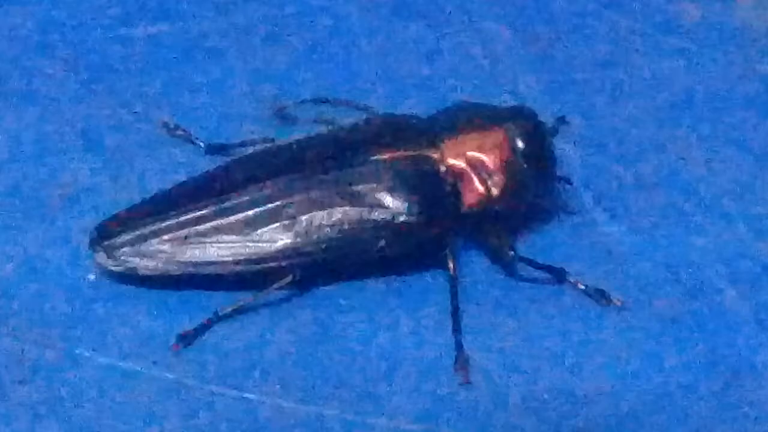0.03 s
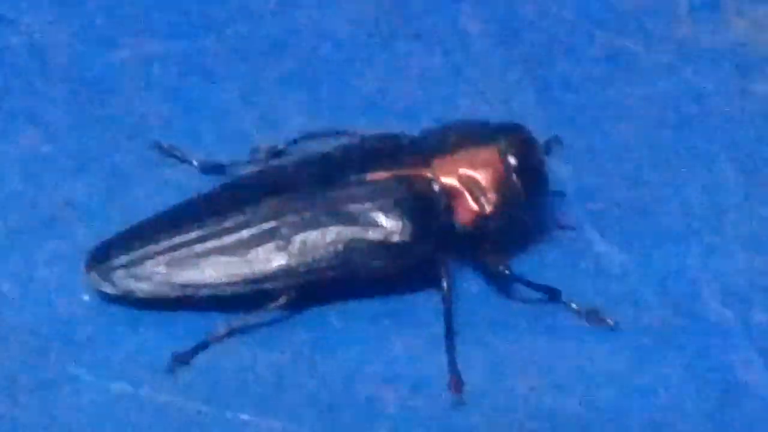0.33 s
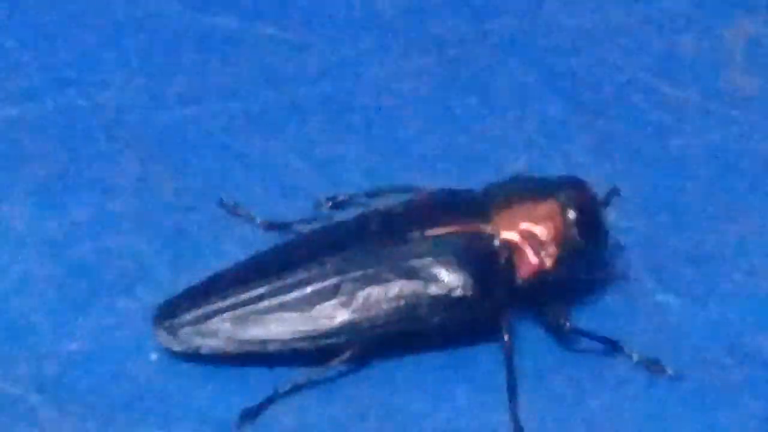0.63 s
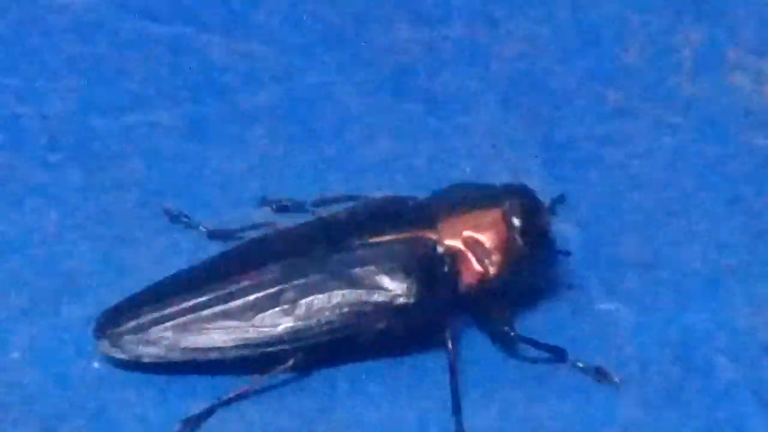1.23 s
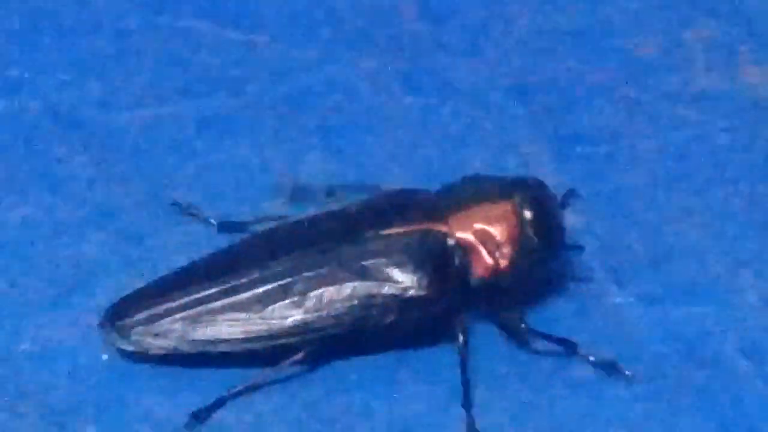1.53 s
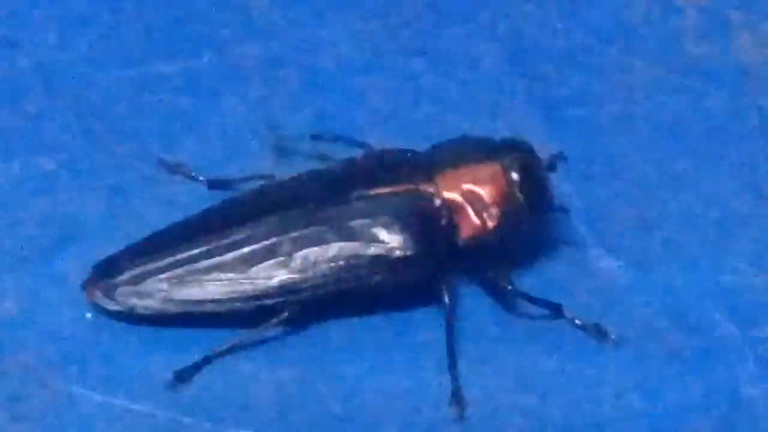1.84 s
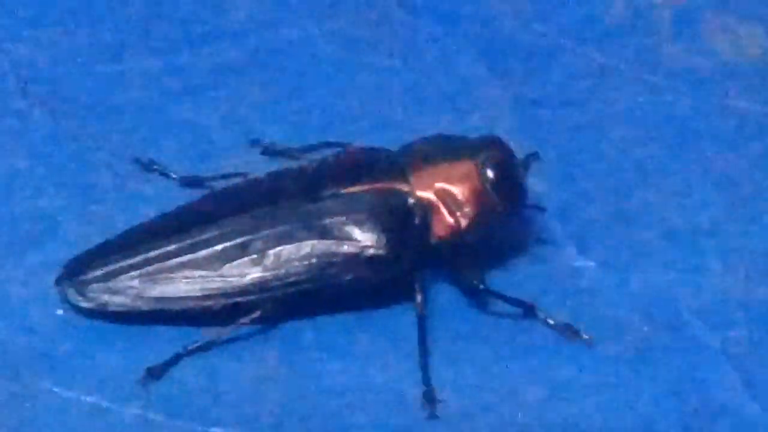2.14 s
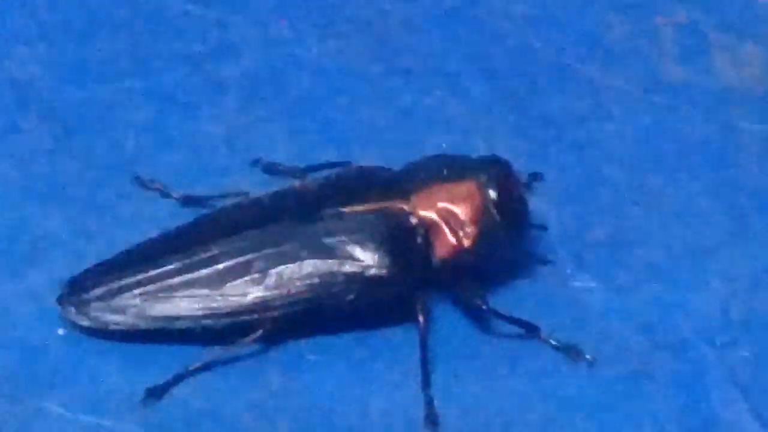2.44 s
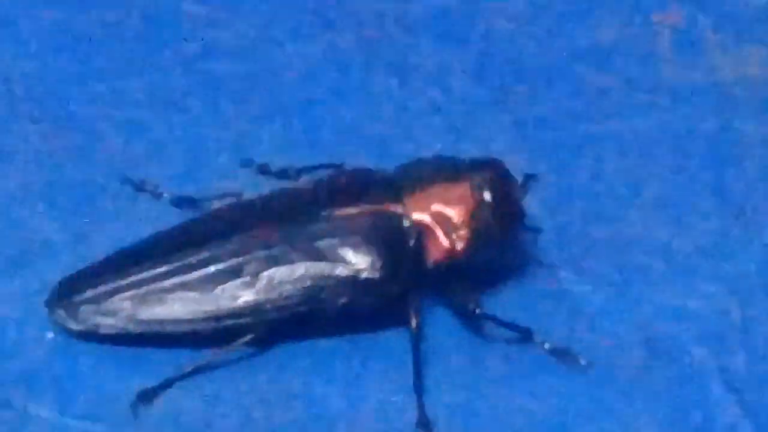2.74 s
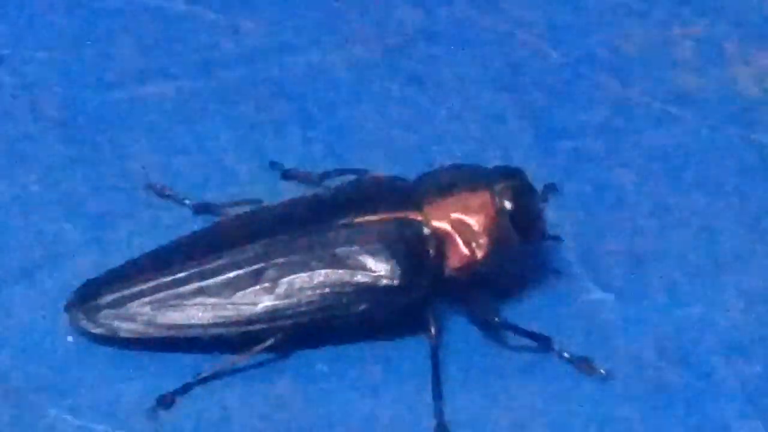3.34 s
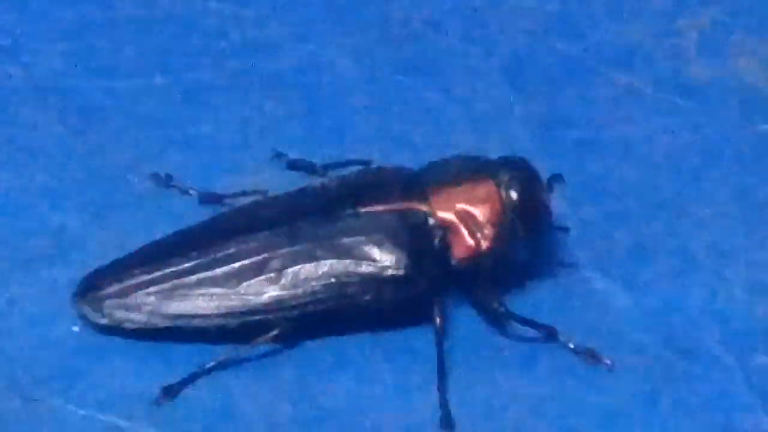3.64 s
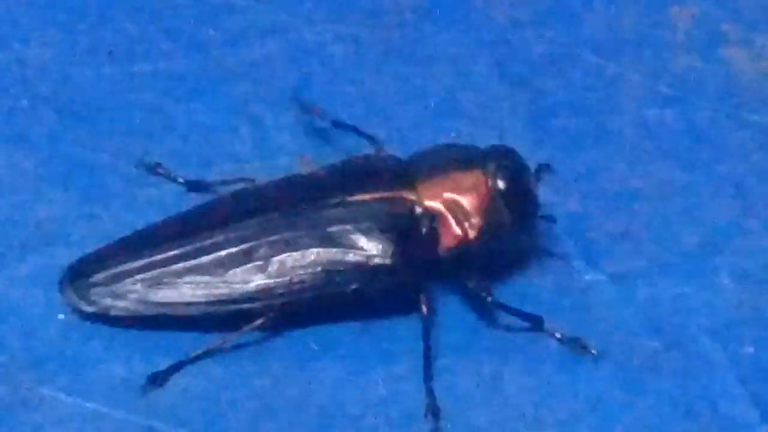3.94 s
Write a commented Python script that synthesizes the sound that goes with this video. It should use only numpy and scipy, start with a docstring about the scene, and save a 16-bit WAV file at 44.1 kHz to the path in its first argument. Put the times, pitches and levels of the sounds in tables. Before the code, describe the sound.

A steady hiss, like rain heard from inside a room, fades in at about 0.4 seconds and runs to the end at 4 seconds, fluttering slightly over low room noise and a barely audible hum. From about 0.9 seconds, faint, brief brushes of handling come and go close by. One sharp tick with a short room echo sounds at 1.6 seconds. The hiss slowly grows a little brighter.

```python
"""A steady hiss, like rain heard from inside a room, fades in after a moment of silence.
It is a wash of mid-range noise that flutters and swells, over a bed of room air and a faint hum.
Something is handled close by: a few faint brushes of friction, and one hard contact that ticks
and leaves a short room tail. The top end slowly brightens. Both channels carry the same signal."""
import sys
import numpy as np
from scipy import signal
from scipy.fft import rfft, irfft
from scipy.io import wavfile

SR = 44100
rng = np.random.default_rng(int(sys.argv[2]) if len(sys.argv) > 2 else 0)


def transcribe(u):
    """Save the signal u as a 16-bit wav file named by the first command-line argument.

    u: samples, shape (n,) or (channels, n), limited to [-1, 1]; the rate is SR.
    q: integer samples, one column per channel.
    """
    v = np.clip(np.atleast_2d(u).T, -1, 1)
    q = np.round(v * 32767).astype(np.int16)
    wavfile.write(sys.argv[1], SR, q)


N = 176400


def from_db(db):
    """Decibels to gain."""
    return 10 ** (np.asarray(db) / 20)


def unit_power(x):
    """Scale to an RMS of one."""
    return x / np.sqrt(np.mean(x ** 2) + 1e-20)


def seconds():
    """Time of every sample."""
    return np.arange(N) / SR


def fader(points):
    """Gain per sample, riding through (time [s], level [dB]) points."""
    return from_db(np.interp(seconds(), *np.transpose(points)))


def bins_hz():
    """Frequency of every spectral bin, kept above zero."""
    return np.maximum(np.arange(N // 2 + 1) * SR / N, 1)


def shaped_noise(gain):
    """Unit-power noise shaped by a gain per bin."""
    return unit_power(irfft(rfft(rng.standard_normal(N)) * gain, N))


def coloured_noise(eq):
    """Unit-power noise through an EQ curve of (frequency [Hz], gain [dB]) points."""
    hz, db = np.transpose(eq)
    return shaped_noise(from_db(np.interp(np.log(bins_hz()), np.log(hz), db)))


def drift(rate_hz):
    """Random modulator with an RMS of one, rolling off above the rate."""
    return shaped_noise(1 / (1 + (bins_hz() / rate_hz) ** 2))


# Tone of the room bed: (frequency [Hz], relative level [dB])
AIR_EQ = [(15, -36), (28, -18), (44, -6.5), (58, -5), (72, -11), (90, -1.5), (116, 3.5), (140, -2.5),
          (175, 1.5), (203, -4.5), (240, 1), (300, -1), (400, -7.5), (1500, -7.5), (3500, -8), (5000, -10),
          (5700, -8.5), (7000, -14.5), (8700, -18.5), (10500, -17), (12000, -23), (16000, -31)]
# Fader ride that brings up the top end: (time [s], level [dB])
SHEEN_LEVEL = [(.7, -51), (1.4, -51), (2, -46.5), (2.8, -46.5), (3.1, -45), (3.35, -44), (3.7, -46),
               (3.85, -44), (3.95, -40.5), (4, -41)]
# Tone of that top end: (frequency [Hz], relative level [dB])
SHEEN_EQ = [(4000, -19), (8500, -8), (11000, 0), (13500, -2), (16000, -7.5)]


def air():
    """An even bed of room noise, topped by a thin sheen that slowly grows."""
    bed = from_db(-34) * coloured_noise(AIR_EQ)
    sheen = fader(SHEEN_LEVEL) * coloured_noise(SHEEN_EQ)
    return bed + sheen


# Tones of the hum: (pitch [Hz], level [dB], RMS pitch wander [Hz])
HUM_TONES = [(175.7, -53, 2.98), (573, -50.5, 2.52)]


def hum():
    """Two wavering tones, almost buried in the bed."""
    out = np.zeros(N)
    for hz, db, wander_hz in HUM_TONES:
        pitch = hz + wander_hz * drift(rate_hz=4.07)
        out += from_db(db) * np.sqrt(2) * np.sin(2 * np.pi * np.cumsum(pitch) / SR)
    return out


# Cues for the brushing touches: (time [s], peak level [dB], length [s], band centre [Hz])
TOUCH_CUES = [(0.874, -40.5, 0.023, 10500), (1.234, -39, .01, 9000), (1.332, -39, .022, 7500),
              (1.525, -38, 0.026, 10500), (1.633, -37, .019, 12000), (1.757, -44, .03, 11000),
              (1.83, -38.5, .035, 9500), (2.303, -42, .033, 11500), (2.571, -42, .02, 9500),
              (2.61, -41, .022, 10000), (3.121, -40, .021, 11000), (3.378, -42, .018, 12500),
              (3.603, -43.5, .02, 12500), (3.968, -38.5, .015, 10000)]


def touches(width_octaves=.45, grain_db=2.5):
    """Each light touch is a grainy puff of bright friction noise: fast attack, then a decay."""
    puffs = np.zeros(N)
    for start, db, length, centre_hz in TOUCH_CUES:
        age = np.maximum(seconds() - start, 0) / (length / 2)
        envelope = age * np.exp(1 - age)  # peaks at half the length
        band = np.exp(-.5 * (np.log2(bins_hz() / centre_hz) / width_octaves) ** 2)
        puffs += from_db(db) * envelope * shaped_noise(band)
    grain = unit_power(from_db(grain_db * drift(rate_hz=300)))
    return puffs * grain


# Tone of the tick's room tail: (frequency [Hz], relative level [dB])
TAIL_EQ = [(2000, -22), (4200, -3), (6500, 0), (9000, -1.5), (11300, -1), (12800, -10), (16000, -19)]


def tick(at_s=1.5975, ring_band_hz=(7400, 10700), tail_db=-23.5, attack_s=.0015, t60_s=.15):
    """One hard contact rings for a few cycles; a diffuse room tail follows."""
    contact = np.zeros(N) + 1e-18
    contact[int(at_s * SR)] = from_db(10.5)
    ring = signal.sosfilt(signal.butter(2, ring_band_hz, "band", fs=SR, output="sos"), contact)
    age = np.maximum(seconds() - at_s, 0)
    attack = 1 - np.exp(-age / attack_s)
    decay = from_db(tail_db - 60 * age / t60_s)
    return ring + attack * decay * coloured_noise(TAIL_EQ)


# Fader ride on the body of the hiss: (time [s], level [dB])
HISS_RIDE = [(.7, -30.5), (.83, -31.5), (1, -29.5), (1.2, -30), (1.5, -31), (1.72, -31), (2.05, -30),
             (2.4, -30.5), (2.65, -30), (2.76, -32), (2.91, -29.5), (3.18, -31.5), (3.3, -29.5),
             (3.52, -30.5), (3.75, -29.5), (4, -30.5)]
# Brief swells added to the body: (peak time [s], width [s], peak level [dB])
HISS_SWELLS = [(.475, 0.021, -30), (0.698, 0.042, -31.5), (0.896, 0.044, -30.5), (1.025, .03, -31.5),
               (1.273, 0.037, -34.5), (1.418, .03, -32), (1.527, 0.057, -30.5), (1.782, 0.035, -32),
               (1.859, 0.029, -29.5), (1.9, 0.038, -28), (2.534, 0.019, -29), (2.584, 0.024, -29.5),
               (2.622, 0.022, -30.5), (3.229, 0.032, -29), (3.935, 0.033, -30)]
# Tone of the hiss, fullest in the mids: (frequency [Hz], relative level [dB])
HISS_EQ = [(100, -22), (250, -5), (400, -3), (750, -0.6), (1450, 0.16), (2500, -3.5), (3500, -10),
           (5000, -16), (8000, -25.5), (16000, -45)]


def hiss(flutter_db=.5):
    """The rain-like wash of noise flutters a little and swells briefly now and then."""
    flutter = from_db(flutter_db * drift(rate_hz=20))
    power = (fader(HISS_RIDE) * flutter) ** 2
    for peak_s, width, db in HISS_SWELLS:
        bell = np.exp(-(2 * (seconds() - peak_s) / width) ** 2)
        power += from_db(db) ** 2 * bell
    return np.sqrt(power) * coloured_noise(HISS_EQ)


def scene():
    """A mono mix of all layers, sent to both channels."""
    mix = hiss() + air() + hum() + tick() + touches()
    return np.tile(mix, (2, 1))


def record(dry, fade_start_s=.41, fade_s=.31, cutoff_hz=15750):
    """Master chain: a fade-in from silence, then a steep high cut."""
    fade = np.clip((seconds() - fade_start_s) / fade_s, 0, 1) ** .85
    high_cut = signal.firwin(401, cutoff_hz, fs=SR)
    return signal.fftconvolve(dry * fade, high_cut[None], "same", axes=1)


dry = scene()
out = record(dry)
transcribe(out)
```